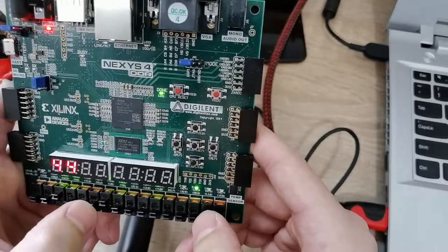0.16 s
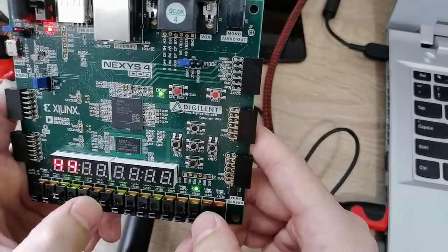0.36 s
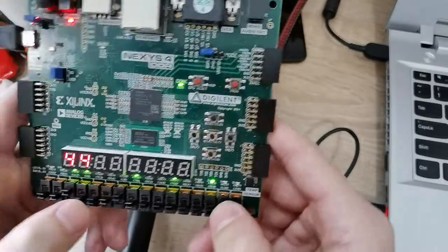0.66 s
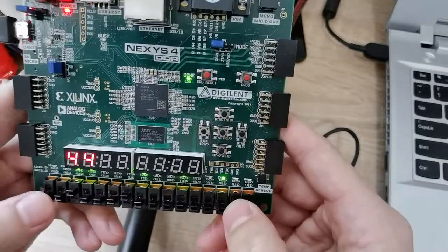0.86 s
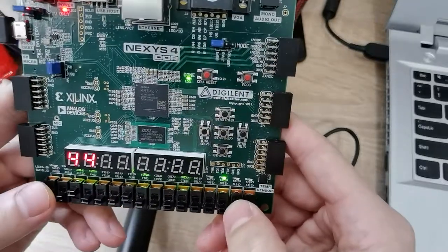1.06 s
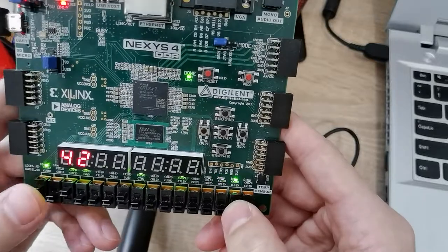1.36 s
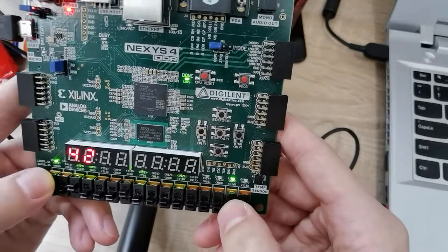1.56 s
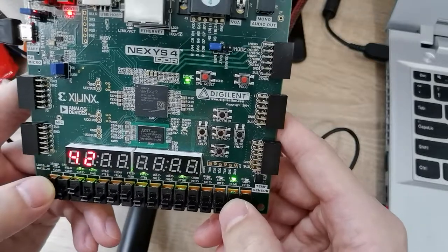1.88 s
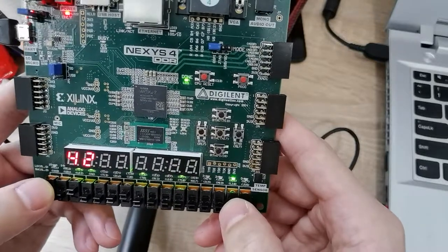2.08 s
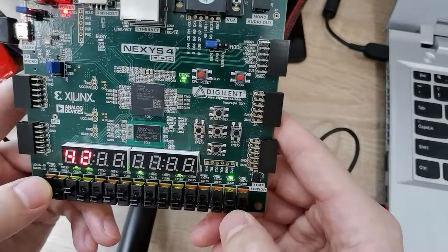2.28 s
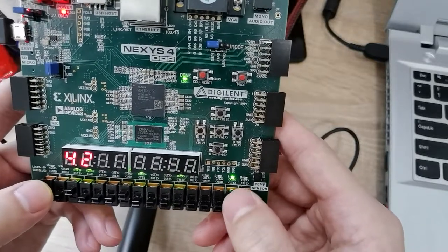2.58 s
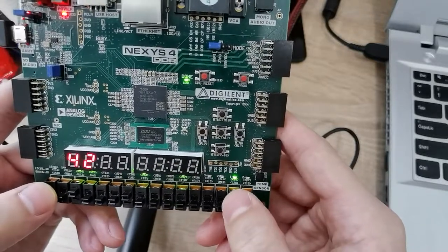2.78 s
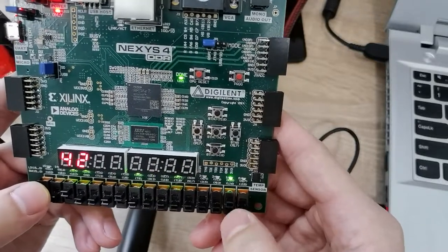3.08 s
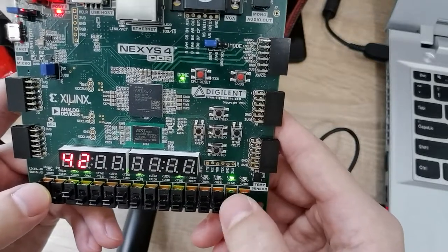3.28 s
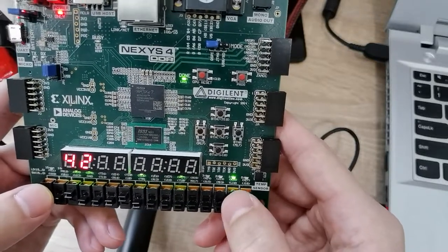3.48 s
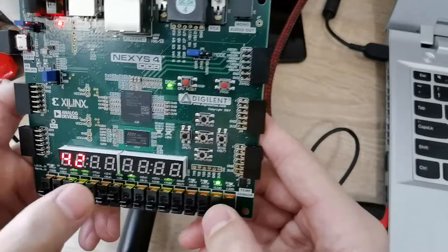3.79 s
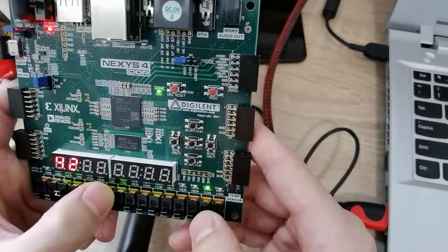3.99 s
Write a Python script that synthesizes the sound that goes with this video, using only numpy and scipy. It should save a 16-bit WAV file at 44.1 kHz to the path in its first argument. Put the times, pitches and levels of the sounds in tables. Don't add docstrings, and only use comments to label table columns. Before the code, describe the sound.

Close up in a quiet room, small plastic slide switches are flipped by thumb. After about a second of low hum and rumble comes a faint nudge, then a very sharp loud snap, a second snap shortly after, a small nail tick, and a long pause before a softer last click. Each has a brief bright room tail. Near stereo microphone, faint hiss.

```python
import sys
import numpy as np
from scipy import signal
from scipy.fft import rfft, irfft
from scipy.io import wavfile
from scipy.ndimage import uniform_filter1d

SR = 44100
rng = np.random.default_rng(int(sys.argv[2]) if len(sys.argv) > 2 else 0)


def gain_from_db(level_db):
    decades = np.asarray(level_db, float) / 20
    return 10 ** decades


def dump(signal):
    limited = np.clip(np.atleast_2d(signal).T, -1, 1)
    pcm = np.round(limited * 32767).astype(np.int16)
    wavfile.write(sys.argv[1], SR, pcm)


N = 182574
T = np.arange(N) / SR
SIDES = np.array([[1], [-1]])


def on_log(hz, table):
    f, value = np.transpose(table)
    return np.interp(np.log(hz), np.log(f), value)


def along(table):
    s, *columns = np.transpose(table)
    return [np.interp(T, s, column) for column in columns]


def band(shape, hz, width_hz):
    f = np.fft.rfftfreq(shape[-1], 1 / SR)
    bell = np.exp(-((f - hz) / width_hz) ** 2)
    y = irfft(rfft(rng.standard_normal(shape)) * bell, shape[-1])
    return y / y.std(axis=-1, keepdims=True)


def walk(rate):
    k = int(SR / rate)
    y = np.repeat(rng.standard_normal(N // k + 1), k)[:N]
    y = uniform_filter1d(uniform_filter1d(y, k), k)
    return y / y.std()


def add(out, s, sound):
    i = int(s * SR)
    out[:, i:i + sound.shape[-1]] += sound


def dip(x, hz, width_hz, share):
    return x - share * signal.lfilter(*signal.iirpeak(hz, hz / width_hz, SR), x)


def colour(x, table, db):
    top_hz = 15800
    f = np.maximum(np.fft.rfftfreq(x.shape[-1], 1 / SR), 1)
    inside = (f < min(top_hz, table[-1][0])) & (f > table[0][0])
    y = irfft(rfft(x) * gain_from_db(on_log(f, table)) * inside, x.shape[-1])
    return y / y.std() * gain_from_db(db)


# t/s, f/Hz
MACHINE_PITCH = [(0, 56.2), (.6, 52.8), (2.0, 53), (3.7, 51.4), (4.14, 49.28)]
# t/s, level/dB
MACHINE_LOAD = [(0.0, -39), (0.09, -37), (0.14, -47), (0.24, -44), (0.34, -60), (0.44, -41.5), (0.47, -52),
                (0.58, -38.5), (1.05, -55.5), (1.3, -51), (1.98, -47.5), (2.43, -52.5), (3.14, -45),
                (3.69, -46.5), (4.14, -54)]
# t/s, f/Hz, level/dB
SECOND_MACHINE = [(0, 59.9, -45), (.7, 60.7, -67), (1.2, 65.8, -62), (3.0, 66.14, -63.5), (3.9, 65.03, -47),
                  (4.14, 64.74, -60)]


def machinery():
    out = 0
    for hz, db in (along(MACHINE_PITCH) + along(MACHINE_LOAD), along(SECOND_MACHINE)):
        level_db = db + 2.5 + 0.51 * walk(5.6)
        phase = 2 * np.pi * np.cumsum(hz + 0.61 * walk(5)) / SR
        out = out + gain_from_db(level_db) * np.sin(phase)
    return out * gain_from_db(1.4 * SIDES)


# t/s, level/dB
TRAFFIC_NEARNESS = [(0, 7.5), (.5, 4), (1.2, 1.5), (1.8, 0.2), (2.3, -2.5), (3.0, -1.6), (3.6, -1.85),
                    (4.14, .3)]
# f/Hz, correlation/1
COHERENCE = [(60, 0.88), (130, 0.93), (290, 0.76), (640, 0.32), (1410, -0.21), (3100, -0.13),
             (6820, -0.074), (15000, -0.061)]
# f/Hz, level/dB
SIDE_TILT = [(60, 1.5), (110, 2.5), (200, -1.5), (380, 2), (700, -0.5), (1290, 2.5), (2380, -4),
             (4400, -1.5), (8120, 0), (15000, -1.5)]
# f/Hz, level/dB per Hz
RUMBLE = [(15, -28.5), (25, -19), (54, 2), (71, -12), (96, -7.5), (134, -5.5), (201, -11.5), (299, -13),
          (363, -21.5), (821, -22.5), (919, -23.5), (1060, -39), (1150, -51.5), (1500, -68.5), (2530, -120)]
# f/Hz, level/dB per Hz
FAN_HISS = [(590, -33.5), (1000, -4), (1080, -4.5), (1280, 0), (1700, -0.5), (1960, -5), (2710, -4),
            (2870, -6), (3150, -15.5), (3920, -12.5), (4720, -24.5), (5230, -21), (6450, -28),
            (14800, -26.5), (15900, -23.5)]
# f/Hz, width/Hz, level/dB
ROOM_MODES = [(101.5, 8, -56), (150, 7, -59), (217, 8, -64), (650, 40, -69)]


def air():
    bass_share, mid_share, treble_share = .6, 0.95, 0.23
    treble_db, boom_db = -0.45, -1.64
    flicker_db, smooth_above_hz = 1.6, 1500
    traffic_db = along(TRAFFIC_NEARNESS)[0]
    bass_db = bass_share * traffic_db + 0.5 * walk(3.767)
    flat = 0
    for hz in 28 * 2 ** np.arange(0, 9.4, 1 / 3):
        like = np.clip(on_log(hz, COHERENCE), -.99, .99)
        mid, side = band((2, N), hz, hz / 5)
        swell = bass_db if hz < 370 else mid_share * traffic_db * min(800 / hz, 1) ** 1.3
        treble = (treble_db + treble_share * traffic_db) * min(hz / 5000, 1) ** 2
        flicker = flicker_db * min(smooth_above_hz / hz, 1) * walk(8)
        db = 10 * np.log10(hz) + swell + treble + flicker
        pair = np.sqrt(1 + like) * mid + SIDES * np.sqrt(1 - like) * side
        flat = flat + gain_from_db(db + SIDES * on_log(hz, SIDE_TILT) / 2) * pair
    out = colour(flat, RUMBLE, -47.5 - 0.5) + colour(flat, FAN_HISS, -66.5 + 4.0)
    for hz, width_hz, db in ROOM_MODES:
        mid, side = band((2, N), hz, width_hz)
        out = out + gain_from_db(db + boom_db + bass_db) * (mid + SIDES * side * min(hz / 1200, 1))
    return dip(out, 7200, 450, .5)


# fastest moment t/s, level/dB, swell/dB per s, fade/dB per s
STROKES = [
    (.86, -75.5, 115, 83.5),
    (3.95, -75.5, 51.5, 102),
]


def brush():
    gain = 0
    for s, db, swell, fade in STROKES:
        gain = gain + gain_from_db(db - np.where(T < s, swell * (s - T), fade * (T - s)))
    grain = gain_from_db(2.2 * walk(200))
    hiss = band((2, N), 8200, 1900)
    hiss = hiss + gain_from_db(-4) * band((2, N), 12000, 2500) + gain_from_db(-5) * band((2, N), 4500, 1500)
    return gain * grain * hiss


def ring_shell(contacts, shell, damping=1.45, scatter_db=2., port_db=1.5, focus_db=6.,
               crack_db=-8., crack_ms=.4, slip=.22, rise_ms=.05):
    out, t = np.zeros((2, N)), T[:1500]
    hz, width, db = (column[:, None] for column in np.transpose(shell))
    each = (len(shell), 1)
    port_gain = port_db * rng.standard_normal(each) * SIDES[:, None]
    turn = np.pi / 4 * np.sign(rng.standard_normal(each)) * SIDES[:, None]
    turn = turn + rng.uniform(0, 2 * np.pi, each)
    for s, peak_db, pan_db, focus_hz in contacts:
        since = int(s * SR) / SR - contacts[0][0]
        phase = 2 * np.pi * hz * since + turn + slip * np.pi * rng.standard_normal(each)
        focus = focus_db * np.exp(-(np.log(hz / focus_hz) / 0.066) ** 2)
        size = gain_from_db(db + focus + port_gain + scatter_db * rng.standard_normal(each)) * width
        modes = size * np.exp(-np.pi * damping * width * t) * np.sin(2 * np.pi * hz * t + phase)
        ring = modes.sum(axis=1) / np.sqrt((size ** 2).sum(axis=1).mean())
        crack = np.diff(rng.standard_normal((2, len(t) + 2)), n=2) * np.exp(-t * 1000 / crack_ms)
        sound = ring + gain_from_db(crack_db) * crack / 4
        rise = 1 - np.exp(-t * 1000 / rise_ms)
        add(out, s, sound * rise * gain_from_db(peak_db + SIDES * pan_db / 2))
    out = signal.sosfilt(signal.butter(3, 2700, "high", fs=SR, output="sos"), out)
    return signal.sosfilt(signal.cheby1(5, .5, 15600, fs=SR, output="sos"), out)


# f/Hz, width/Hz, level/dB
FIRST_SHELL = [(2880, 600, -12), (3850, 290, -8), (6280, 180, -15), (6760, 150, -9), (7700, 300, 0),
               (8430, 360, -8), (9170, 250, -11), (9690, 160, -14), (10200, 250, -17), (12000, 190, -25),
               (12400, 200, -25), (13100, 340, -21)]
# t/s, peak level/dB, left minus right level/dB, most excited f/Hz
NAIL_TICKS = [
    (1.1330, -60, 0, 10000),
    (1.4390, -58, 0, 9000),
    (2.1133, -52, 0, 8400),
    (2.1155, -55, 0, 9000),
]


def ticks():
    return ring_shell(NAIL_TICKS, FIRST_SHELL)


def chatter(s, peak_db, climb_ms, fall_db, slip_db, pan_db, count=11):
    slip_ms, rebound_ms, uneven = 1.4, .8, .15
    climb_db_per_ms, scatter_db = 2.1, 1.0
    first_focus_hz, dulling_ms, focus_scatter = 13500, 4.5, .3
    luck = rng.standard_normal((count, 3))
    ms = np.cumsum(rebound_ms * np.exp(uneven * luck[:, 0]))
    ms = np.r_[-slip_ms, ms[1:] - ms[1]]
    climb = climb_db_per_ms * np.maximum(climb_ms - ms, 0)
    fall = fall_db * np.maximum(ms - climb_ms, 0)
    db = peak_db - climb - fall + scatter_db * luck[:, 1]
    db = np.r_[peak_db + slip_db, db[1:]]
    focus_hz = first_focus_hz * np.exp(focus_scatter * luck[:, 2] - np.abs(ms) / dulling_ms)
    return list(zip(s + ms / 1000, db, np.full(count, pan_db), focus_hz))


# f/Hz, width/Hz, level/dB
SECOND_SHELL = [(1630, 240, -23), (2800, 300, -16), (3840, 290, -3), (6470, 770, -6), (7700, 240, -8),
                (8470, 300, -4), (10100, 210, -11), (11000, 240, -9), (11900, 230, -10), (13100, 310, 0),
                (14900, 590, -4), (15500, 170, -10)]
THIRD_SHELL = [(1880, 510, -12), (2900, 310, -11), (3970, 600, -4), (5090, 200, -9), (5990, 180, -10),
               (6490, 210, -11), (7710, 340, -4), (8570, 210, -9), (9350, 690, -4), (11000, 730, -7),
               (12100, 200, -6), (13200, 480, 0), (13800, 170, -6), (14400, 240, -2), (15400, 250, -3)]
FOURTH_SHELL = [(1660, 250, -17), (2610, 180, -20), (3990, 480, -2), (5670, 240, -1), (6440, 320, 0),
                (8000, 220, -10), (8960, 220, -7), (10100, 350, -6), (11300, 280, -18), (13100, 210, -14),
                (13700, 260, -10), (15200, 700, -10), (16500, 170, -21)]
# first contact t/s, peak level/dB, climb to it/ms, fall/dB per ms, slip level re peak/dB
SLIDER_FLIPS = [
    (1.1532, -38, 0.0, 5.8, -19),
    (1.3097, -10.5, .9, 3.0, -18),
    (1.7187, -12, 2.2, 4.2, -19),
    (3.7105, -18, 0.5, 3.6, -36),
]
# left minus right level/dB, contact rise/ms, crack level/dB,
# f/Hz cancelled by the echo off the hand, its width/Hz
HAND_GRIP = [
    (3.5, .05, -8, 5200, 900),
    (1.8, .05, -5, 8900, 800),
    (.8, .05, -5, 8300, 800),
    (-1.2, .07, -6, 5000, 1100),
]


def switches():
    shells = [FIRST_SHELL, SECOND_SHELL, THIRD_SHELL, FOURTH_SHELL]
    out = 0
    for row, grip, shell in zip(SLIDER_FLIPS, HAND_GRIP, shells):
        pan_db, rise_ms, crack_db, hollow_hz, width_hz = grip
        contacts = chatter(*row, pan_db)
        snap = ring_shell(contacts, shell, rise_ms=rise_ms, crack_db=crack_db, slip=.28)
        out = out + dip(snap, hollow_hz, width_hz, .85)
    return dip(out, 5600, 3000, -.55)


ANSWER_STARTS = [
    1.1535,
    1.3105,
    1.7195,
    3.7110,
]
# (f/Hz, level/dB per Hz)
ANSWERS = [
    (-67, [(2060, -38), (3500, -5.5), (4100, 1.5), (5570, -18.5), (6870, -12), (7850, -9), (8800, -18.5), (16000, -22.5)]),
    (-47, [(1470, -28.5), (2500, -3.5), (2850, 0.5), (3180, -9), (3770, 2.5), (4760, -8.5), (6700, -3), (7250, -6), (8800, -3), (11500, -11.5), (13100, 0.5), (14700, -0.5), (16000, -9)]),
    (-49.5, [(1470, -31.5), (2500, -8), (2680, -5), (3550, -8.5), (3690, -10), (4270, -0.5), (4730, -15), (4950, -13), (6700, -16), (7470, -7), (11600, -14), (13900, -8), (16000, -14)]),
    (-54, [(1760, -11), (3000, -1.5), (3150, -11), (3650, 3.5), (4170, -6), (4830, -17), (5670, -4), (6040, 1), (7350, -13), (8580, -11), (11000, -17), (15100, -7), (16000, -8)]),
]


def room(gap_ms=1.3, early_db=4.0, early_ms=5.5, spread_db=-2.0):
    t60_s, air_loss_hz = 0.53, 19120
    out, t = np.zeros((2, N)), T[:int(.42 * SR)]
    f = np.fft.rfftfreq(len(t), 1 / SR)
    edges = 2000 * 2 ** np.arange(0, 3.2, 1 / 3)
    early = 1 + gain_from_db(early_db) * np.exp(-t * 1000 / early_ms)
    onset = np.minimum(t * 1000 / gap_ms, 1) ** 2
    for s, (db, spectrum) in zip(ANSWER_STARTS, ANSWERS):
        noise = rng.standard_normal((2, 2 * len(t)))
        noise = colour(noise, spectrum, db - spread_db)[:, :len(t)]
        for low, high in zip(edges, edges[1:]):
            part = irfft(rfft(noise) * (np.digitize(f, [low, high]) == 1), len(t))
            loss = 1 + low * high / air_loss_hz ** 2
            fall = np.exp(-np.log(1000) * t / t60_s * loss) * early
            add(out, s, part * fall * onset)
    return out


# t/s, peak level/dB, board ring f/Hz, ring level re peak/dB
THUMB_KNOCKS = [
    (1.3098, -41, 1640, -4),
    (1.3122, -43, 960, -3),
    (1.3125, -41, 760, -5),
    (1.7190, -44, 1640, 0),
    (1.7203, -39, 320, 0),
    (1.7215, -44, 760, 0),
    (2.1133, -40, 1750, -12),
    (3.7115, -55, 1670, 0),
    (3.7110, -52, 310, 0),
]


def knocks():
    out, t = np.zeros((2, N)), T[:2500]
    for s, peak_db, ring_hz, ring_db in THUMB_KNOCKS:
        contact_ms = .8 * (1000 / ring_hz) ** 0.36
        ring_ms = 7 * (1000 / ring_hz) ** 0.27
        push = -np.sin(np.pi * np.minimum(t * 1000 / contact_ms, 1)) ** 2
        ring = gain_from_db(ring_db) * np.exp(-t * 1000 / ring_ms) * np.sin(2 * np.pi * ring_hz * t)
        add(out, s, gain_from_db(peak_db) * (push + ring)[None])
    return out


def scene():
    steady = machinery() + air()
    return steady + brush() + ticks() + switches() + room() + knocks()


def top_cut(x):
    return signal.sosfilt(signal.butter(12, 16850, fs=SR, output="sos"), x)


def record(dry):
    return top_cut(dry)


dry = scene()
out = record(dry)
dump(out)
```